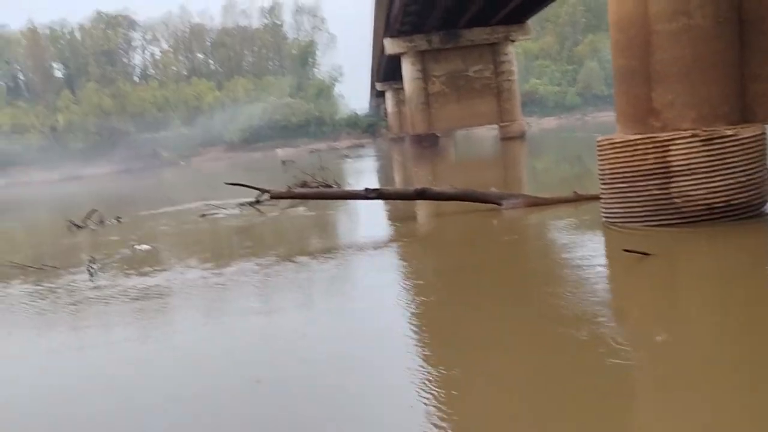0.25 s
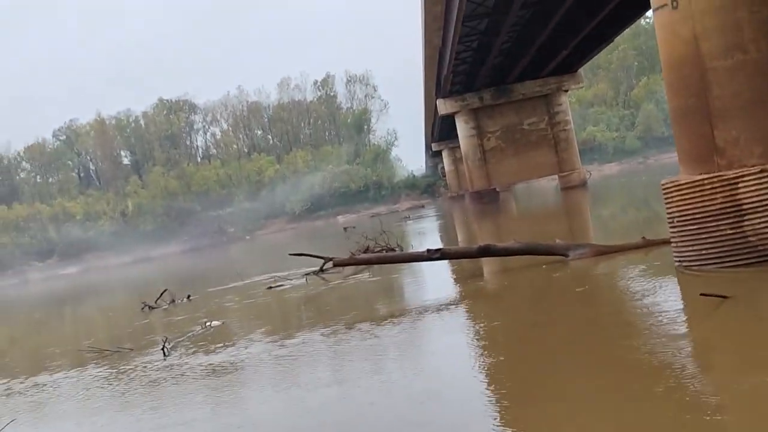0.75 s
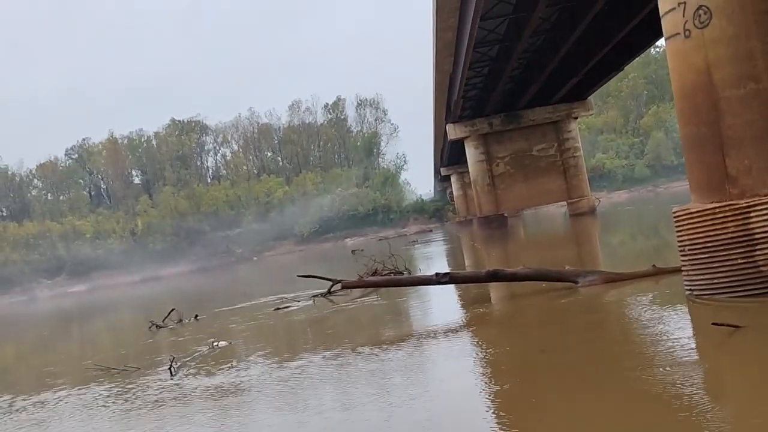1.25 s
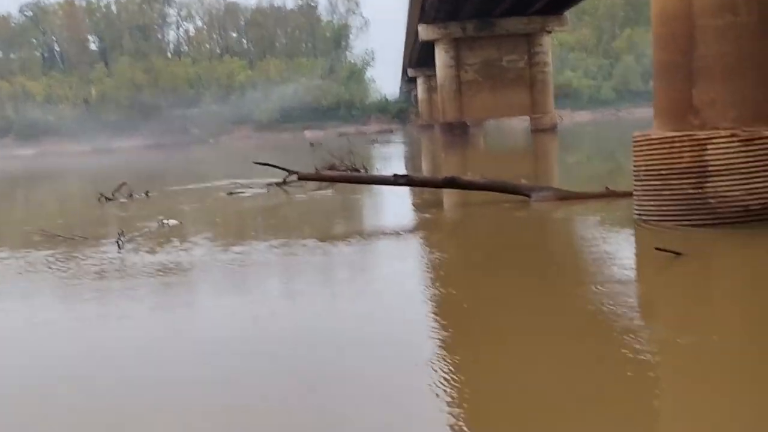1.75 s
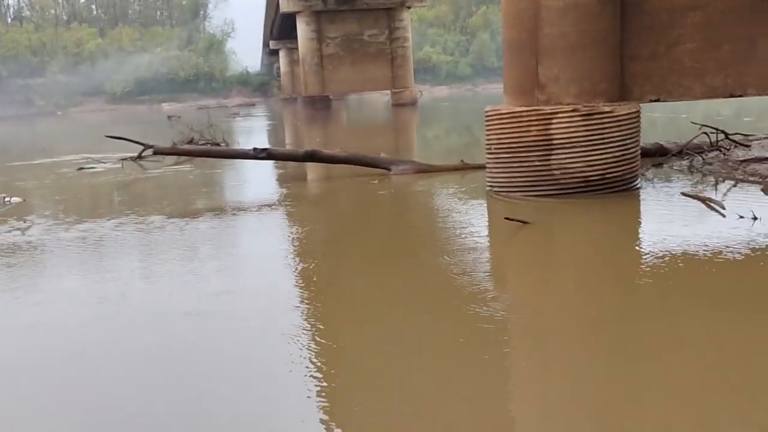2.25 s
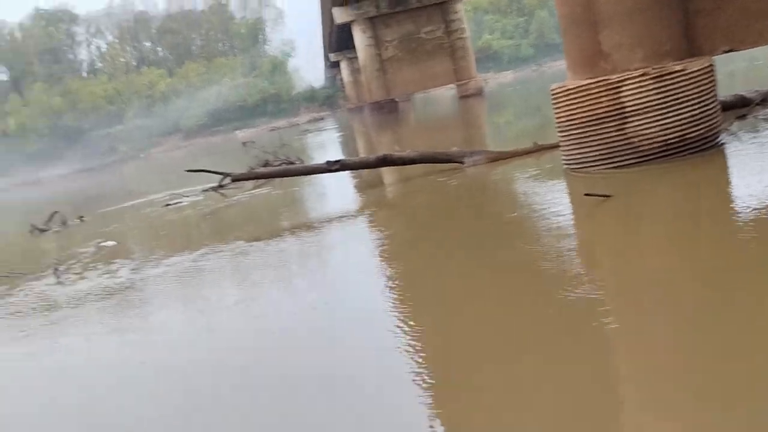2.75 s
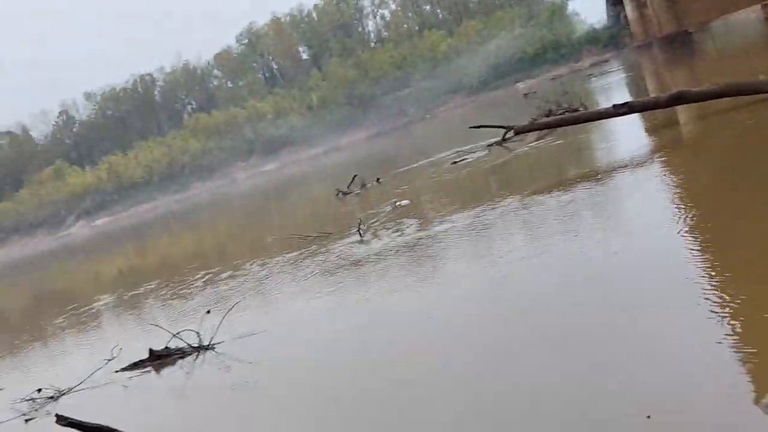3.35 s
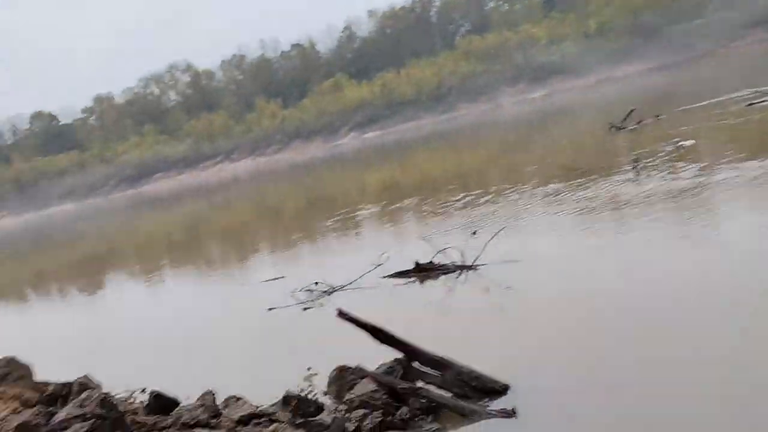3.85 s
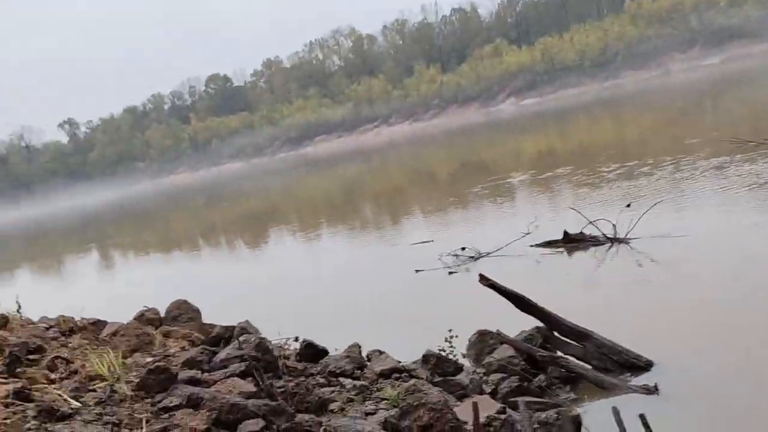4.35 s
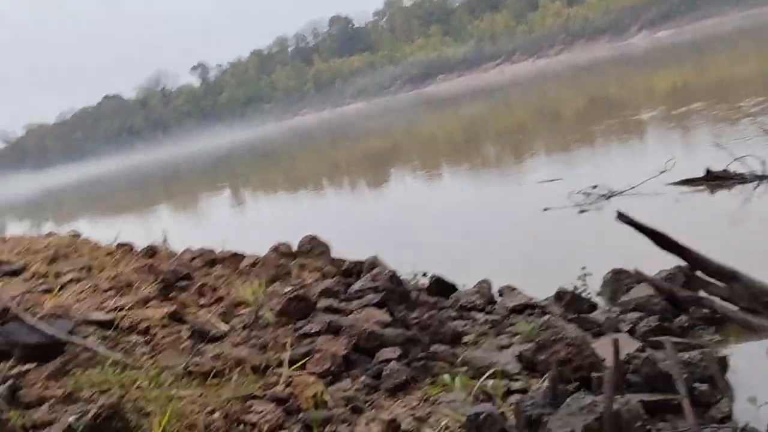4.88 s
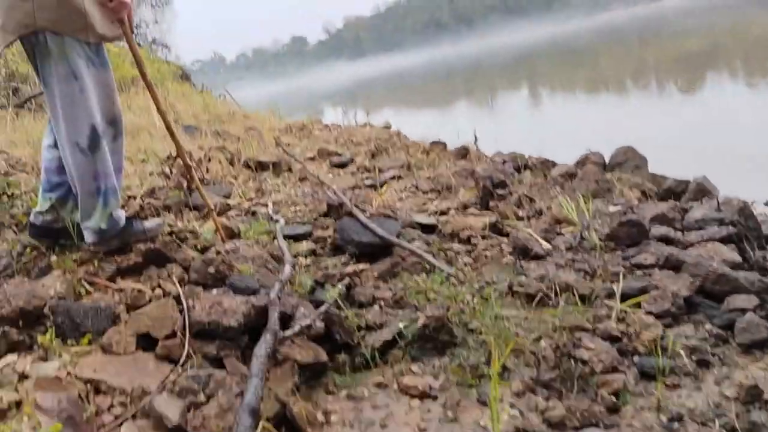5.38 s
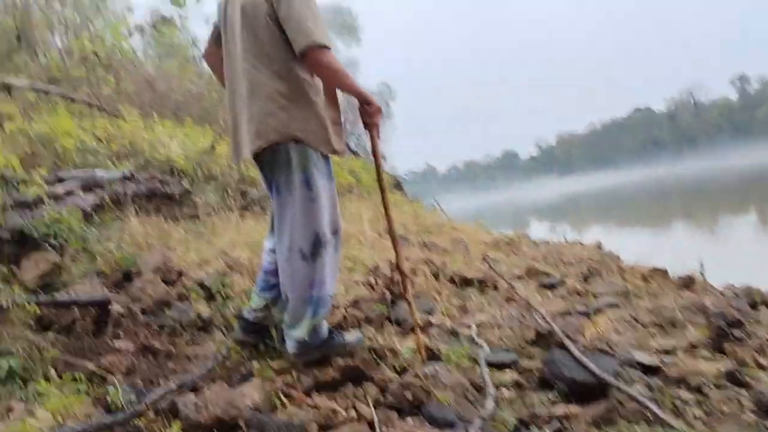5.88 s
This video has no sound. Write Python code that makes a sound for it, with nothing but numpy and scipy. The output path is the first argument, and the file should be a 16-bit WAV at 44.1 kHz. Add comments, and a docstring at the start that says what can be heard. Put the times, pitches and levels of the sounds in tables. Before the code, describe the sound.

A phone under a bridge picks up a heavy vehicle already overhead: booming deck, quick muffled axle thumps over joints, hissing and roaring tyres. It draws away with falling pitch, leaving low humming concrete and a faint unsteady whine over soft open-air hush. A dry rustle comes midway, tiny gritty crunches are scattered underfoot, then loose stones clack sharply close by, followed by a smaller click.

```python
"""A lorry crosses a concrete bridge high above a river bank and drives off, over a faint open-air hush.
Shaped noise makes the deck rumble and hum; decaying sine waves make its axles thump over the joints.
The tyres roar in noise and whine and whistle in smeared tones, which sink in pitch as they pass overhead.
Close to the phone, bursts of noise make grit crunch now and then, something rustle briefly, and loose
stones knock near the end, with two high clinks from sine waves."""
import sys
import numpy as np
from scipy import signal
from scipy.fft import rfft, irfft
from scipy.io import wavfile
from scipy.ndimage import uniform_filter1d

SR = 44100
rng = np.random.default_rng(int(sys.argv[2]) if len(sys.argv) > 2 else 0)


def store_wav(level_fs):
    """Save 16-bit WAV to argv[1]."""
    pcm = np.round(np.clip(np.atleast_2d(level_fs), -1, 1) * 32767)
    wavfile.write(sys.argv[1], SR, pcm.T.astype(np.int16))


N = 269945  # length of the sound [samples]
TIME = np.arange(N) / SR  # [s]
FREQ = np.maximum(np.arange(N // 2 + 1) * SR / N, 1)  # [Hz]
SPEED, HEIGHT, SOUND_SPEED = 26.5, 15.5, 343  # lorry [m/s], its height above us [m], sound [m/s]
PORT_GAP = 0.1  # distance between the two microphone ports [m]
PORT_MATCH = .987  # how alike the two ports hear the longest waves (0-1)


def undb(db):
    """Turn decibels into a gain."""
    return 10 ** (np.asarray(db) / 20)


def unit(x):
    """Scale a sound to an average strength (rms) of 1."""
    return x / np.sqrt(np.mean(x ** 2))


def fade_out(t, t60):
    """Die away by 60 dB in t60 seconds."""
    return np.exp(-np.log(1000) * t / t60)


def colour(points):
    """Draw a gain at every frequency through (frequency [Hz], level [dB]) points."""
    hz, db = np.transpose(points)
    return undb(np.interp(np.log(FREQ), np.log(hz), db))


def band(points):
    """Draw a spectrum that falls away steeply beyond its first and last point."""
    low_edge = np.minimum(FREQ / points[0][0], 1) ** 4
    high_edge = np.minimum(points[-1][0] / FREQ, 1) ** 6
    return colour(points) * low_edge * high_edge


def walk(rate):
    """Wander smoothly by chance, with a spread of 1, changing about rate times a second."""
    return unit(irfft(rfft(rng.standard_normal(N)) * np.exp(-(FREQ / rate) ** 2), N))


def two_ports(mid, side):
    """Turn the shared and the opposite part of a sound into left and right."""
    return np.array([mid + side, mid - side])


def diffuse(gain):
    """Make noise from all sides at two ports: long waves reach both alike."""
    alike = PORT_MATCH * np.sinc(2 * FREQ * PORT_GAP / SOUND_SPEED)
    mid, side = rfft(rng.standard_normal((2, N))) * gain * np.sqrt([1 + alike, 1 - alike])
    return unit(irfft(two_ports(mid, side), N))


def even(x, seconds):
    """Take the slow swells out of a narrow noise."""
    power = uniform_filter1d(np.mean(x ** 2, axis=0), max(int(seconds * SR), 1))
    return x / np.sqrt(power + 1e-9)


def add(out, s, sound):
    """Mix a sound in at a time in seconds."""
    start = int(s * SR)
    out[..., start:start + sound.shape[-1]] += sound[..., :N - start]


def doppler(overhead_s):
    """Give the pitch factor of a source that is overhead at a given time: higher before, lower after."""
    along = SPEED * (TIME - overhead_s)  # distance along the road [m]
    return 1 / (1 + SPEED / SOUND_SPEED * along / np.hypot(along, HEIGHT))


# how the level of each part moves as the lorry goes by; its player may trim or waver the level:
# part: (turning time [s], level then [dB], breadth [s], slope before [dB/s], slope after [dB/s])
# a positive slope lowers the part away from the turning time, a negative slope raises it
PART_PASSES = {"rumble": (0.55, -22.5, 0.84, 40, 0.9), "near span": (2.5, -26.5, 0.5, -8, 1),
               "far span": (4.5, -32, 0.6, -1, 4.5), "span octave": (2, -35.5, 2.5, -7, 7.5),
               "drone": (2, -26.5, 4, -2, 14), "roar": (2, -28.5, 2.5, 7, 9.5),
               "howl": (2.5, -39, 4, 16, 8.5), "rush": (1.425, -37, 2.5, 13, 9),
               "hiss": (1.27, -45.5, 2.5, 13.5, 6.5), "sizzle": (1.65, -38.5, 1.5, 14, 36),
               "whistle": (0.63, -40.5, 0.86, 25, 4.5), "deck whine": (2.5, -37, 1.5, 0.5, 20)}


def passing(part):
    """Follow a part's level in dB: it spreads with distance, with its own further slope before and after."""
    turning_s, db, breadth_s, slope_before, slope_after = PART_PASSES[part]
    away_s = np.hypot(TIME - turning_s, breadth_s)
    spreading = 20 * np.log10(away_s / breadth_s)
    sloping = np.where(TIME < turning_s, slope_before, slope_after) * (away_s - breadth_s)
    return db - spreading - sloping


# the steady hush of the river bank: (frequency [Hz], relative level [dB per Hz])
BANK_SPECTRUM = [(230, 5), (430, 8.5), (600, 4), (900, -15), (1070, -5), (1190, 2.5), (1620, 1.5),
                 (2680, -8), (4810, -23), (9150, -16), (14000, -46)]


def bank(level_db=-49):
    """A faint open-air hush, steady broad noise, that is left when the lorry has gone."""
    return diffuse(band(BANK_SPECTRUM)) * undb(level_db)


# the low rumble of the deck: (frequency [Hz], relative level [dB per Hz])
RUMBLE_SPECTRUM = [(18, -35), (40, -20.5), (48, -15), (57, -13.5), (69, -2), (84, -4.5), (97, 6), (112, -4),
                   (127, 7), (137, -4)]
# the broad boom of the spans: (frequency [Hz], relative level [dB per Hz])
BOOM_SPECTRUM = [(100, -34), (118, 1.5), (134, -13), (149, -5.5), (166, -1), (195, -8)]
SPAN_HZ, SPAN_WIDTH_HZ = 148.4, 4.7  # the main resonance of a span
NEAR_BOOM_DB, FAR_BOOM_DB = -5, -3.5  # share of broad boom in each span


def deck(rumble_shake_db=-15, boom_shake_db=-13, near_hum_db=-6, far_hum_db=1.0):
    """Rolling wheels keep the concrete rumbling; spans boom and hum in turn; every blow adds a shudder."""
    low, boom = (even(diffuse(band(spectrum)), .12) for spectrum in (RUMBLE_SPECTRUM, BOOM_SPECTRUM))
    hum, octave = (even(diffuse(1 / (1 + ((FREQ - hz) / SPAN_WIDTH_HZ) ** 2)), .15)
                   for hz in (SPAN_HZ, 2 * SPAN_HZ))
    shake = shudder()
    near = np.hypot(undb(passing("near span")), undb(boom_shake_db) * shake)
    far = undb(passing("far span"))
    # independent strengths join as the root of the sum of their squares
    rumble_gain = np.hypot(undb(passing("rumble")), undb(rumble_shake_db) * shake)
    boom_gain = np.hypot(undb(NEAR_BOOM_DB) * near, undb(FAR_BOOM_DB) * far)
    hum_gain = np.hypot(undb(near_hum_db) * near, undb(far_hum_db) * far)
    return low * rumble_gain + boom * boom_gain + hum * hum_gain + octave * undb(passing("span octave"))


# the layers of tyre noise, each listed as (frequency [Hz], relative level [dB per Hz]):
# the low drone of the tyre carcasses
DRONE_SPECTRUM = [(160, -18), (190, -1), (225, 1), (258, -1.5), (296, 1.5), (325, -0.5), (420, -4.5),
                  (500, -10.5)]
# the roar of the treads
ROAR_SPECTRUM = [(380, -18), (445, 7.5), (500, 1), (555, 7.5), (615, 0), (700, 1), (810, -2), (950, -6),
                 (1070, -7.5), (1170, -13.5)]
# the howl under the girders
HOWL_SPECTRUM = [(690, -7.5), (750, -3.5), (840, -3), (910, -3)]
# the rush above the roar
RUSH_SPECTRUM = [(900, 1), (1100, 0.5), (1450, 2), (1750, -1), (2050, -1.5), (2850, -7.5), (3400, -16.5)]
# the broad treble hiss
HISS_SPECTRUM = [(2900, 4.5), (3300, 0.5), (4200, 2), (5600, -1.5), (7000, 0), (9000, 3), (14000, -20.5)]
# the highest sizzle, which also colours the rustle
SIZZLE_SPECTRUM = [(6500, -4), (7200, -0.5), (8000, 1.5), (8900, 5.5), (9700, 1), (10800, -6.5),
                   (12500, -10.5), (14400, -16)]


def tyre_noise(flutter_db=-0.16, flicker_db=0.83, overhead_s=1.3):
    """Carcasses drone, treads roar and hiss, girders howl; uneven concrete makes them flutter together."""
    road = walk(23)
    # the roar travels with the wheels, so its resonances sink as they pass
    emitted = np.cumsum(doppler(overhead_s))
    still = diffuse(band(ROAR_SPECTRUM))
    moving = np.array([np.interp(emitted, np.arange(N), side, period=N) for side in still])
    layers = {"drone": diffuse(band(DRONE_SPECTRUM)),
              "roar": moving,
              "howl": diffuse(band(HOWL_SPECTRUM)),
              "rush": diffuse(band(RUSH_SPECTRUM)),
              "hiss": diffuse(band(HISS_SPECTRUM)),
              "sizzle": diffuse(band(SIZZLE_SPECTRUM))}
    out = 0
    for part, noise in layers.items():
        # each layer also flickers by itself
        out = out + noise * undb(passing(part) + flutter_db * road + flicker_db * walk(33))
    return out


def rolling_tone(axles, hz, width_hz):
    """Make a smeared tone from every axle, each with its own Doppler fall as it passes overhead."""
    out = 0
    alike = np.sinc(2 * hz * PORT_GAP / SOUND_SPEED)
    line = 1 / (1 + (np.fft.fftfreq(N, 1 / SR) / width_hz) ** 2)
    for overhead_s, db in axles:
        chance = rng.standard_normal((2, N)) + 1j * rng.standard_normal((2, N))
        smear = np.fft.ifft(line * chance)
        phase = 2 * np.pi * np.cumsum(hz * doppler(overhead_s)) / SR
        out = out + undb(db) * np.real(smear * np.exp(1j * phase))
    mid, side = out * np.sqrt([[1 + alike], [1 - alike]])
    return unit(two_ports(mid, side))


# axles whose treads whistle: (time when overhead [s], relative level [dB])
WHISTLE_AXLES = [(.25, -3), (.5, -4), (.7, -2.5), (.87, -2), (1.02, 0), (1.17, -1), (1.35, -1)]
# axles whose treads whine: (time when overhead [s], relative level [dB])
TREAD_WHINE_AXLES = [(.45, -3.5), (.8, -4), (1.1, -1.5), (1.4, -2), (1.75, -4.5)]
# the whine wavers as the lorry draws away: (time [s], level before waver [dB], level of its octave [dB])
WHINE_LEVELS = [(0, -56, -60), (.8, -32, -37), (1.8, -37.5, -35), (2.5, -37, -50.5), (3.1, -33.5, -46),
                (3.4, -37, -63), (3.65, -46, -41), (4.05, -42.5, -53), (4.22, -38, -48.5),
                (4.5, -45, -53.5), (4.75, -53, -46), (5.0, -41, -51), (5.2, -41, -55), (5.3, -51, -48),
                (5.55, -45.5, -50.5), (5.8, -45, -56), (5.95, -56.5, -61), (6.1, -50, -61)]
# once the lorry is far off, its axles whine on one clean pitch: (time [s], clean share [0-1])
WHINE_CLEAN_SHARE = [(3.45, 0.02), (4.3, 0.71)]
WHINE_HZ, WHISTLE_HZ = 510.5, 6735  # before the Doppler shift


def tyre_tones(deck_width_hz=16, deck_octave_db=-16, waver_db=1.0, wander_hz=2.2, flicker_db=1.7):
    """Treads whine with an octave under a thin whistle; the still deck radiates the whine unshifted."""
    times, whine_db, octave_db = np.transpose(WHINE_LEVELS)
    clean = np.clip(np.interp(TIME, *np.transpose(WHINE_CLEAN_SHARE)), 0, 1)
    clean_hz = WHINE_HZ * doppler(TREAD_WHINE_AXLES[-1][0]) + wander_hz * walk(7.2)
    phase = 2 * np.pi * np.cumsum(clean_hz) / SR

    smeared_low = even(rolling_tone(TREAD_WHINE_AXLES, WHINE_HZ, width_hz=5.5), 0.13)
    low = smeared_low * np.sqrt(1 - clean) + np.sqrt(2 * clean) * np.sin(phase)
    smeared_upper = even(rolling_tone(TREAD_WHINE_AXLES, 2 * WHINE_HZ, width_hz=15.6), 0.14)
    upper = smeared_upper * np.sqrt(1 - clean / 2) + np.sqrt(clean) * np.sin(2 * phase)
    low_gain = undb(np.interp(TIME, times, whine_db) + waver_db * walk(16))
    whine = low * low_gain + upper * undb(np.interp(TIME, times, octave_db))

    lines = sum(undb(db) / (1 + ((FREQ - hz) / deck_width_hz) ** 2)
                for hz, db in [(WHINE_HZ, 0), (2 * WHINE_HZ, deck_octave_db)])
    from_deck = even(diffuse(lines), 0.23) * undb(passing("deck whine"))

    whistle_gain = undb(passing("whistle") + flicker_db * walk(22))
    whistle = rolling_tone(WHISTLE_AXLES, WHISTLE_HZ, width_hz=80) * whistle_gain
    return whine + from_deck + whistle


# wheels striking joints, near and then far; their shudder uses these blows too:
# (time [s], relative level [dB], frequency that the blow excites most [Hz])
JOINT_BLOWS = [(0.085, -9.5, 104), (0.21, -8.5, 100), (0.268, -1, 125), (0.314, 2.5, 103),
               (0.378, 1.5, 148), (0.48, -5, 100), (0.647, 2.5, 125), (0.706, 3.5, 112), (0.738, 1.5, 150),
               (0.79, -1.5, 148), (0.88, -9, 110), (1.593, -9, 111), (3.09, -14, 90), (3.485, -8.5, 150),
               (4.259, -24, 165), (4.62, -14, 140), (5.291, -27, 107), (5.55, -22.5, 100)]
# ways the deck can ring: (frequency before a small detuning [Hz], relative level [dB], time to fall 60 dB [s])
DECK_RINGS = [(71.6, -17, .3), (96, -5, 0.29), (127.3, -13.5, 0.27), (148, -6.5, 0.34), (169, -7, 0.17),
              (287.5, -7, 0.23), (380, -2, 0.16)]
CUSHION_S = .018  # time over which a tyre cushions a blow


def joints(thump_db=-2, reach_octaves=.55):
    """Each wheel that drops over a joint hits the deck softly; where it lands decides which modes answer."""
    out, t = np.zeros(N), TIME[:SR // 2]
    detunings = rng.standard_normal((len(JOINT_BLOWS), len(DECK_RINGS)))
    for (s, db, centre_hz), detune in zip(JOINT_BLOWS, detunings):
        ring = 0
        for (hz, mode_db, t60), d in zip(DECK_RINGS, detune):
            share = undb(mode_db) / (1 + (np.log2(hz / centre_hz) / reach_octaves) ** 2)
            tone = np.sin(2 * np.pi * hz * (1 + 0.013 * d) * t)
            ring = ring + share * tone * fade_out(t, t60)
        # the tyre cushions the blow, so the ring swells in without a click
        add(out, s, undb(db + thump_db) * ring * (1 - np.exp(-(t / CUSHION_S) ** 2)))
    return out


def shudder(attack_s=0.054, t60_s=0.39):
    """Give the strength of the shaking left by blows at the joints: each swells quickly and dies away."""
    power = 0
    for s, db, _ in JOINT_BLOWS:
        age = np.maximum(TIME - s, 0)
        swell = 1 - np.exp(-age / attack_s)
        power = power + (undb(db) * swell * fade_out(age, t60_s)) ** 2
    return np.sqrt(power)


def causal(gain):
    """Give a gain curve the phase of a real resonator, which rings only after it is struck."""
    cepstrum = irfft(np.log(gain + 1e-4))
    half = len(cepstrum) // 2
    return np.exp(rfft(np.r_[cepstrum[0], 2 * cepstrum[1:half]], len(cepstrum)))


# resonances of the stones: (frequency [Hz], width [Hz], boost [dB])
STONE_RESONANCES = [(520, 180, 9), (900, 130, 8.5), (1430, 580, 6.5), (2750, 800, 3.5), (3950, 700, 5),
                    (5100, 730, 9.5), (8900, 2600, 12.5)]


def stone_colour(x, hz, octaves):
    """Ring a short burst through the stone modes, in a band set by the size of the contact."""
    f = np.maximum(np.arange(x.shape[-1] // 2 + 1) * SR / x.shape[-1], 1)
    body_db = sum(db / (1 + (2 * (f - centre) / width) ** 2) for centre, width, db in STONE_RESONANCES)
    gain = undb(body_db) / (1 + abs(np.log2(f / hz) / octaves) ** 3)
    alike = np.sinc(f * PORT_GAP / SOUND_SPEED)
    mid, side = rfft(x) * causal(gain) * np.sqrt([1 + alike, 1 - alike])
    return irfft(two_ports(mid, side))


# grit shifting underfoot: (time [s], level [dB], length [s], middle of its band [Hz])
GRIT_CRUNCHES = [(0.312, -39, 0.014, 10500), (1.058, -33, 0.014, 9450), (2.56, -44.5, 0.13, 9800),
                 (2.97, -53, 0.11, 9500), (3.328, -47.5, 0.039, 8300), (3.66, -57, 0.43, 8760),
                 (3.681, -50, 0.31, 2230), (4.171, -52, 0.012, 9300), (4.754, -49, 0.012, 9500),
                 (4.874, -58, 0.071, 6100), (5.232, -43, 0.047, 8750), (5.319, -47, 0.093, 7250),
                 (5.391, -60.5, 0.42, 8560), (5.657, -52, 0.023, 6960), (5.822, -46, 0.0044, 8800),
                 (5.973, -53.5, .025, 8500)]


def grit(size=32768, scatter_db=1.5, octaves=0.78):
    """Soles press on sand: brief swarms of tiny cracks of unequal size."""
    out, t = np.zeros((2, N)), TIME[:size]
    for s, db, length, hz in GRIT_CRUNCHES:
        # a new chance strength every 32 samples
        crack_db = scatter_db * np.repeat(rng.exponential(size=size // 32), 32)
        cracks = rng.standard_normal((2, size)) * undb(crack_db)
        # pressure peaks after a quarter of the length, then eases
        press = 4 * t / length * np.exp(1 - 4 * t / length)
        add(out, s, undb(db) * press * unit(stone_colour(cracks, hz, octaves)))
    return out


# a soft rustle close by swells and stops short: (time [s], level before grain [dB])
RUSTLE_LEVELS = [(2.2, -75), (2.33, -46), (2.45, -47.5), (2.6, -48), (2.8, -50), (2.82, -68)]


def rustle(grain_db=2.5):
    """A bright rustle near the phone, perhaps a sleeve: treble noise with a fast, grainy level."""
    level_db = np.interp(TIME, *np.transpose(RUSTLE_LEVELS), left=-np.inf, right=-np.inf)
    return diffuse(band(SIZZLE_SPECTRUM)) * undb(level_db + grain_db * walk(150))


# stones knocking together: (time [s], body level [dB], body frequency [Hz], body breadth [octaves],
# tick level [dB], tick frequency [Hz], time for the scrape to fall 60 dB [s])
STONE_KNOCKS = [(5.2138, -34, 1470, 0.63, -37.5, 9000, 0.0069), (5.3015, -53, 1700, .7, -41, 11500, .004),
                (5.3067, -38, 1390, 1.24, -49, 6500, 0.016), (5.3414, -25.5, 700, 0.64, -52, 10500, 0.0034),
                (5.343, -34, 2280, 0.35, -52, 6000, 0.0064), (5.3488, -28.5, 520, 0.41, -39, 8800, 0.013),
                (5.3515, -33, 900, 1.3, -35.5, 6800, 0.016), (5.5858, -50, 960, 0.8, -47, 11500, 0.008),
                (5.5877, -46, 1400, 0.7, -40, 7200, 0.012)]
BODY_LAG_S = 0.00104  # a stone's body answers just after the tick of contact
TAIL_S = .28  # time for a knock's scatter off the bank to fall 60 dB
KNOCK_S = .005  # time over which the level of a knock is taken


def stones(size=16384, contact=8, tail_db=-27, tick_octaves=0.74):
    """Loose stones knock: a hard contact with dull body and bright tick, then faint scatter off the bank."""
    out, t = np.zeros((2, N)), TIME[:size]
    noises = rng.standard_normal((len(STONE_KNOCKS), 2, size))
    for knock_row, noise in zip(STONE_KNOCKS, noises):
        s, body_db, body_hz, body_octaves, tick_db, tick_hz, ring_s = knock_row
        scrape = noise * (fade_out(t, ring_s) + undb(tail_db) * fade_out(t, TAIL_S))
        blow = contact * np.outer([1, 0], t == 0)  # a single spike in the part that both ports share
        body = stone_colour(scrape + blow, body_hz, body_octaves)
        tick = stone_colour(scrape + blow / 2, tick_hz, tick_octaves)
        for lag_s, db, knock in [(BODY_LAG_S, body_db, body), (0, tick_db, tick)]:
            strength = np.sqrt(np.sum(knock ** 2) / (2 * KNOCK_S * SR))
            add(out, s + lag_s, undb(db) * knock / strength)
    return out


# small hard stones that clink: (time [s], level before attack and fade [dB], pitch [Hz], time to fall 60 dB [s])
STONE_CLINKS = [(5.3526, -33, 5350, 0.013), (5.5867, -34, 5500, 0.019)]


def clinks(size=4096, attack_s=.0006):
    """A small hard stone rings briefly on one high note."""
    out, t = np.zeros((2, N)), TIME[:size]
    for s, db, hz, t60 in STONE_CLINKS:
        note = np.sin(2 * np.pi * hz * t) * (1 - np.exp(-t / attack_s)) * fade_out(t, t60)
        add(out, s, undb(db) * note)
    return out


def from_right(sound, lag_s):
    """Delay the left port for a sound that comes from the right."""
    left, right = sound
    return np.array([irfft(rfft(left) * np.exp(-2j * np.pi * FREQ * lag_s), N), right])


def scene(deck_lag_s=0.00015, tyre_lag_s=.00028):
    """Place the bridge overhead and a little to the right, and the bank underfoot."""
    concrete = from_right(deck() + joints(), deck_lag_s)
    tyres = from_right(tyre_noise() + tyre_tones(), tyre_lag_s)
    return bank() + concrete + tyres + grit() + rustle() + stones() + clinks()


# the left microphone port is muffled in the treble: (frequency [Hz], level [dB])
LEFT_PORT_RESPONSE = [(3000, 0), (5600, -0.5), (6500, -5), (7500, -16), (9000, -23), (11000, -22),
                      (14000, -14)]
# the steady hiss of the microphones: (frequency [Hz], relative level [dB per Hz])
MIC_HISS_SPECTRUM = [(5000, -1), (7000, 4), (9000, 2), (11000, -3), (14000, -4.5)]


def record(dry, hiss_db=-71.5, top_hz=14300):
    """The phone hears less treble on the left, adds its own faint hiss and cuts the top."""
    noise = rfft(rng.standard_normal((2, N))) * band(MIC_HISS_SPECTRUM)
    hiss = unit(irfft(noise, N)) * undb(hiss_db)
    left = irfft(rfft(dry[0]) * colour(LEFT_PORT_RESPONSE), N)
    ports = np.array([left, dry[1]]) + hiss
    top_cut = signal.ellip(10, .2, 80, top_hz, fs=SR, output="sos")
    return signal.sosfilt(top_cut, ports)


dry = scene()
out = record(dry)
store_wav(out)
```